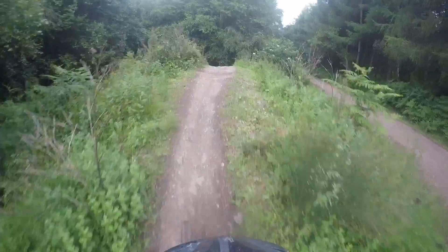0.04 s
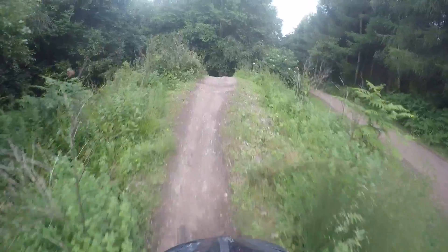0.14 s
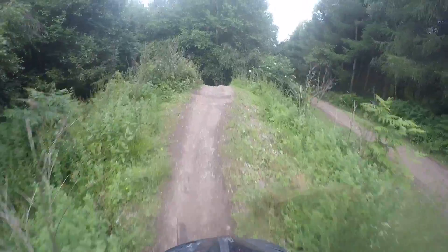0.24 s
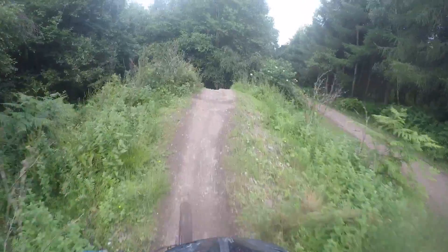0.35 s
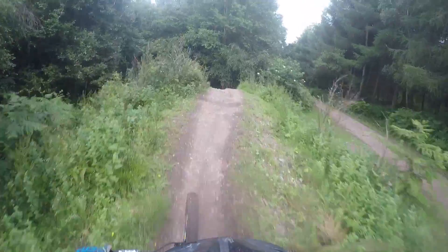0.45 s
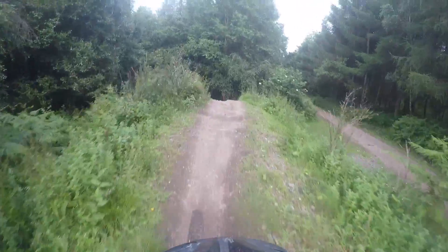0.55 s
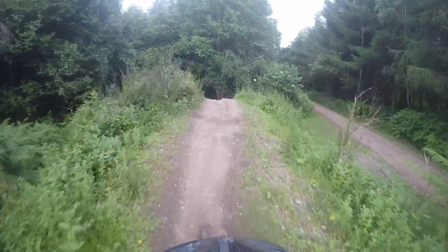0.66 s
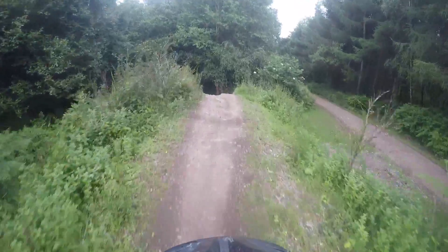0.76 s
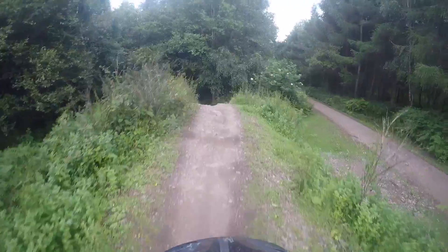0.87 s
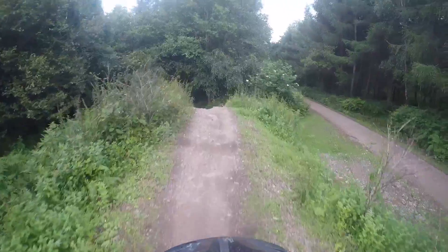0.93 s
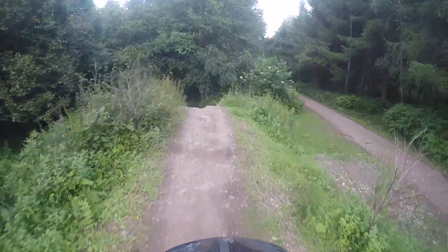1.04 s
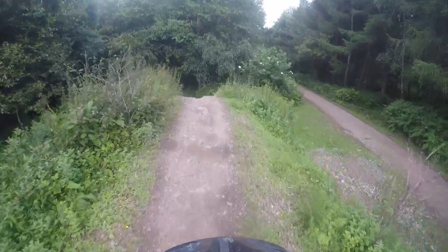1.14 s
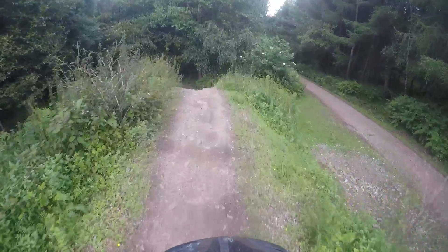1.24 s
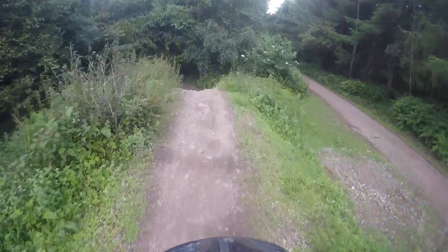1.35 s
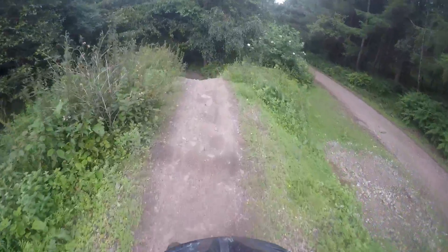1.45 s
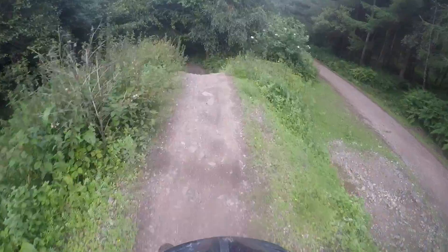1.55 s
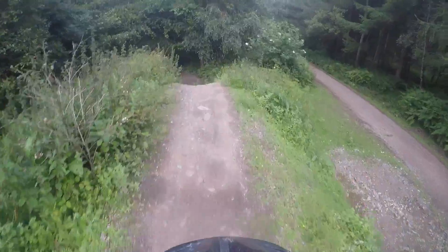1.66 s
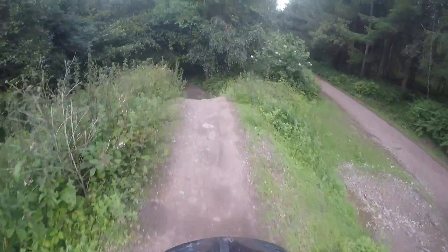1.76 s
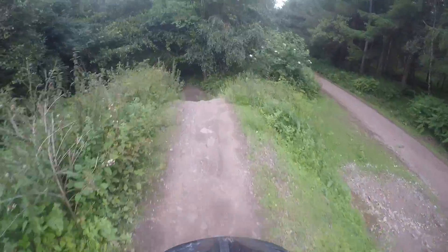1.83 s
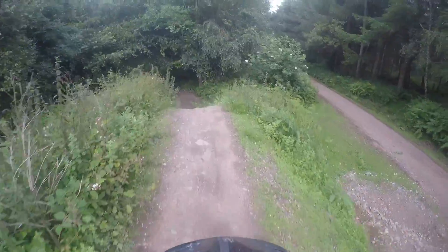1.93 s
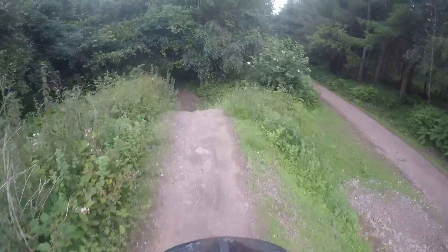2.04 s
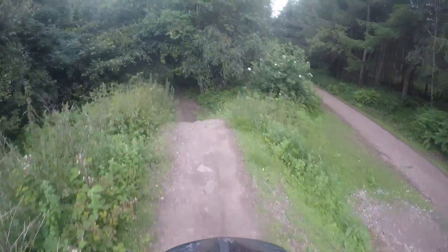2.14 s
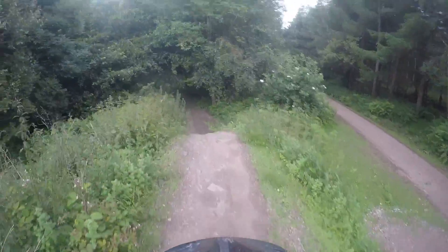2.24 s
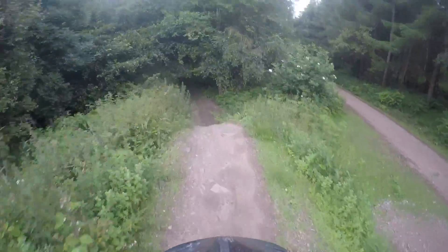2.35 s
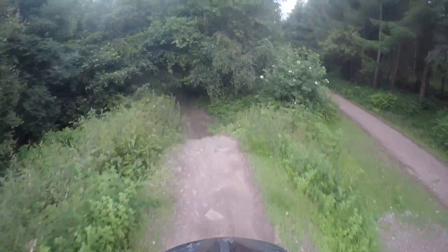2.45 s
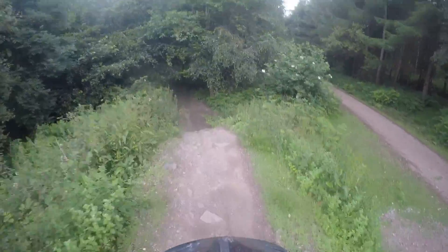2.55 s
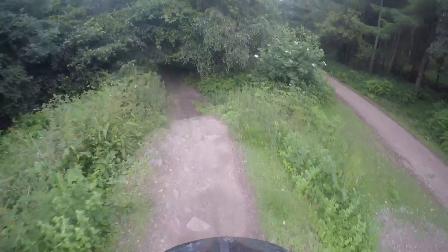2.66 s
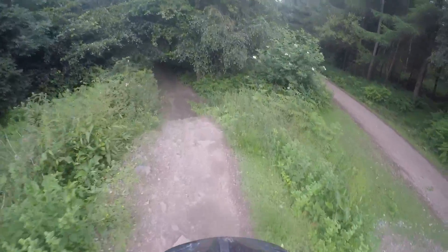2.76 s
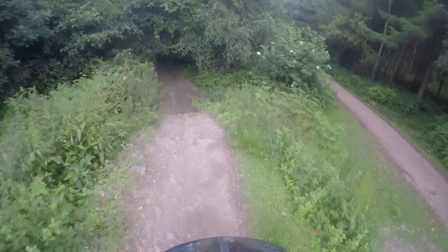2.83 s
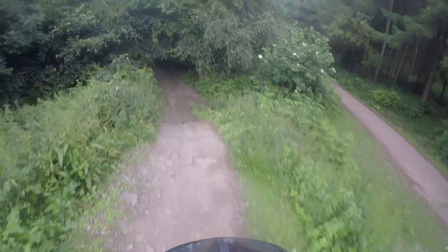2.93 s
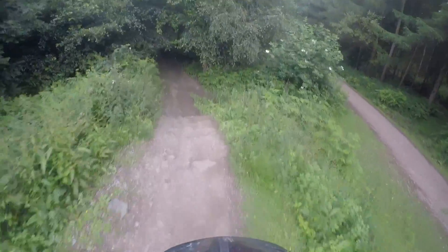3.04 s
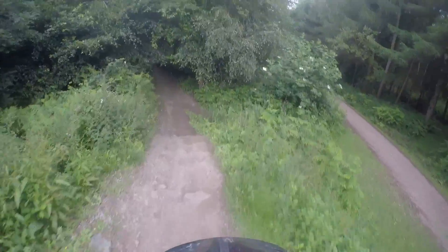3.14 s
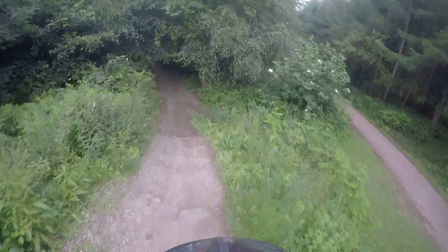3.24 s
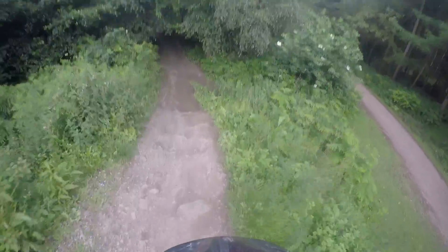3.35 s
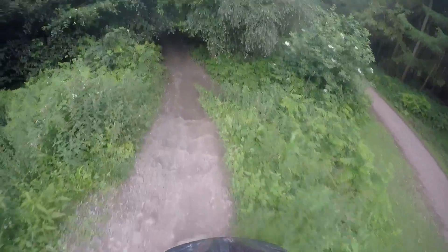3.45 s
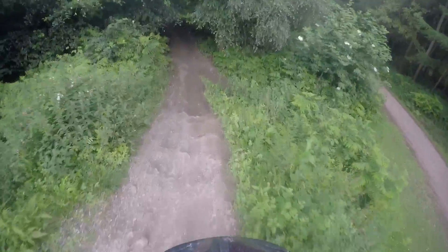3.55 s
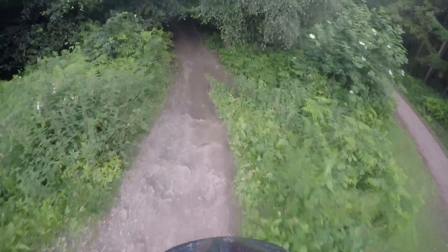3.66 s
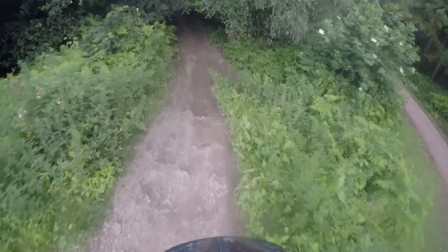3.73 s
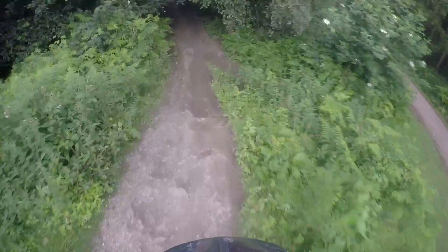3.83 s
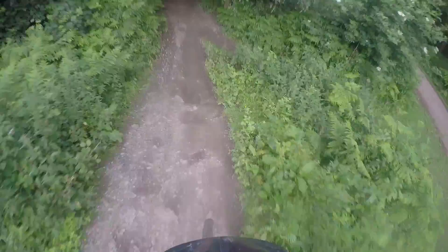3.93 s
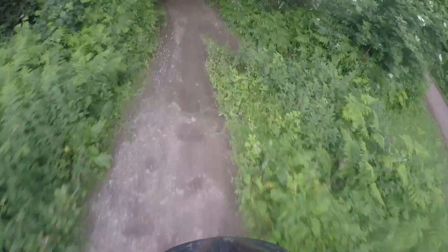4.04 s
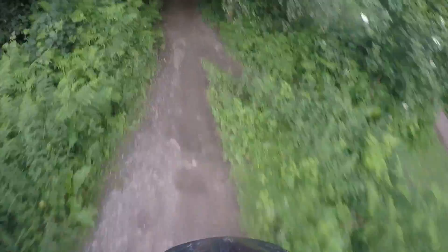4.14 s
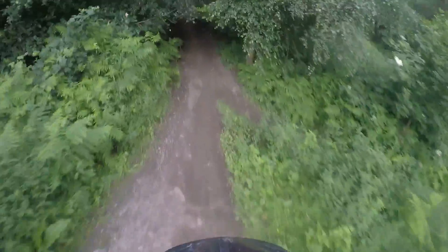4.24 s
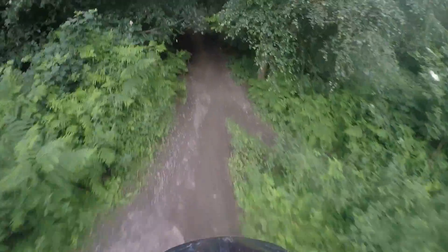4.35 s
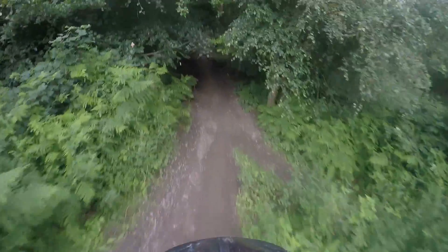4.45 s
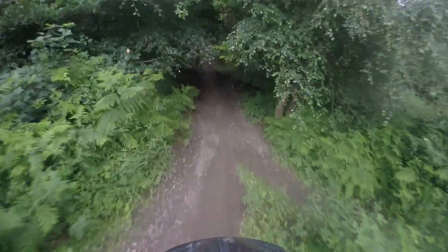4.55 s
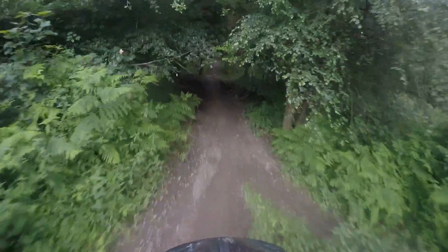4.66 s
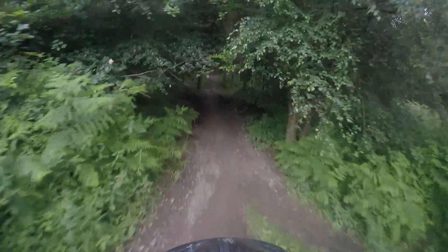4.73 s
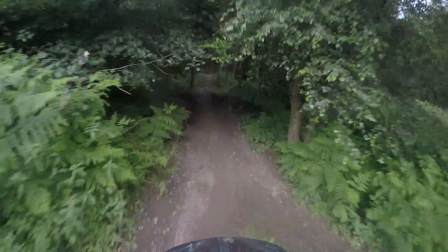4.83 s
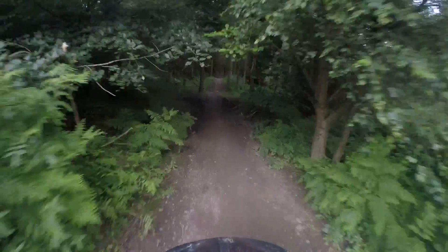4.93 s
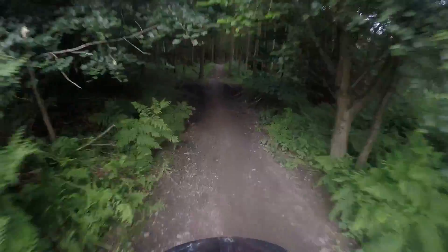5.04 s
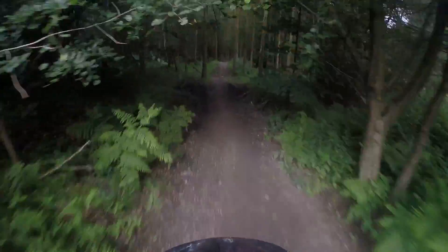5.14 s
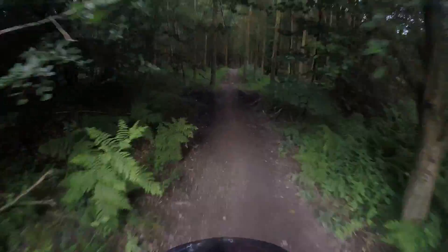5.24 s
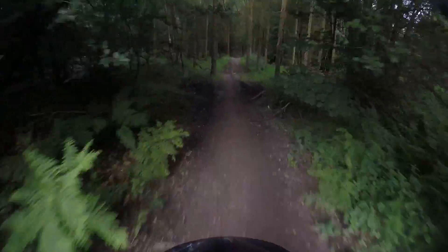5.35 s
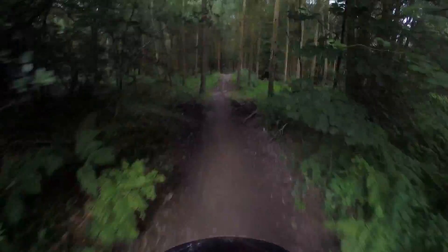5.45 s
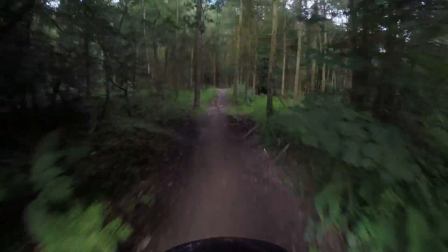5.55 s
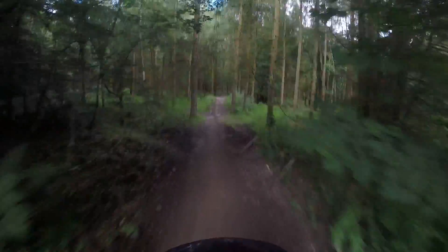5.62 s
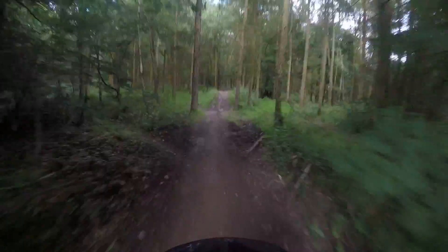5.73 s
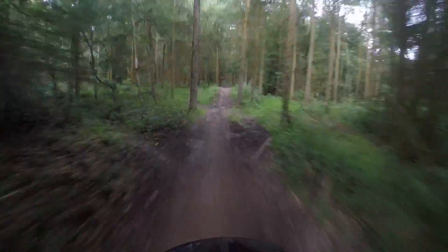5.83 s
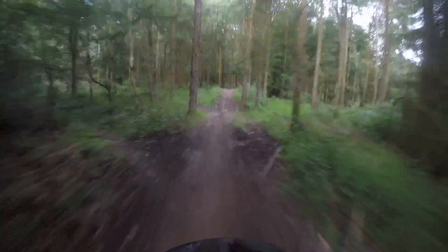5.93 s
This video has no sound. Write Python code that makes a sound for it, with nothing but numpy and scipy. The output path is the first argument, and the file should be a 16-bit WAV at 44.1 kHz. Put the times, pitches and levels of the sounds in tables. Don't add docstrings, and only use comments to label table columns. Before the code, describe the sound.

Inside a sealed helmet-camera case, a mountain bike rolls down a dirt trail. The first second is quiet: soft low wind puffs, faint steady hiss, hollow tyre grit and a creaky click around 0.8 s. At 1.27 s a sharp plastic clack and low jolt mark the crest, followed by small rattles and a lull until about 2.3 s. From 2.4 to 3.2 s bumps bring bursts of stony rumble, with a crisp tick at 2.8 s. Wind grows after 3.2 s, gusting strongly near 3.85 s, with knocks at 3.45, 3.97 and 4.25 s. Around 4.35 to 4.7 s hard thumps and clacks cluster, the helmet swings with a deep thud, and airy rushing opens up. Leaves whip sharply at 4.9 s and brush longer around 5.3 s. Deep wind booms until the end, with a hard knock at 5.7 s and a heavy low swing near 5.9 s.

```python
import sys
import numpy as np
from scipy import signal
from scipy.fft import rfft, irfft
from scipy.io import wavfile
from scipy.ndimage import uniform_filter1d

SR = 44100
rng = np.random.default_rng(int(sys.argv[2]) if len(sys.argv) > 2 else 0)


def wav_out(sig):
    wavfile.write(sys.argv[1], SR, np.round(np.clip(np.atleast_2d(sig).T, -1, 1) * 32767).astype(np.int16))


def natural_amplitude(level_db):
    exponent = np.asarray(level_db, float) / 20
    return 10 ** exponent


N = 264159
T_S = np.arange(N) / SR
HZ = np.fft.rfftfreq(N, 1 / SR)
CALM_DB = -54

# time in seconds, level in dB.
AIR_SPEED = [(0.0, -47.5), (.15, -54.5), (.68, -48.5), (.97, -54), (1.27, -48), (1.55, -56.5), (2.2, -53.5),
             (2.7, -51), (3.15, -49.5), (3.25, -42), (3.79, -42), (4.0, -36), (4.15, -39.5), (4.55, -31.5),
             (4.72, -28), (4.97, -27.5), (5.55, -25), (5.99, -22.5)]
# time in seconds, level in dB.
PORT_STREAM = [(.03, -71), (.25, -72), (.8, -68.5), (1.25, -68.5), (1.4, -70), (2.15, -72.5), (2.4, -68.5),
               (4.2, -66.5), (4.44, -60), (4.53, -51), (4.74, -50.5), (4.8, -54), (4.92, -54.5),
               (4.97, -46), (5.35, -47), (5.4, -48), (5.62, -45.5), (5.7, -42)]
# peak in seconds, tyre swell in dB, port swell in dB, fall in seconds.
BUMPS = [(.01, 5, 3, 0.03), (.84, 3, 0, .05), (1.3, 17.5, 9, 0.054), (2.3, 3, 0, .1),
         (2.5, 12.5, 6.5, 0.11), (2.63, 10, 7, 0.063), (2.82, -10, 3, 0.017), (2.88, 6, 6, .05),
         (3.0, 8, 8.5, 0.064), (3.08, 11.5, 3, 0.048), (3.17, 8, 5, 0.035), (3.32, -2, 8.5, 0.032),
         (3.45, 3, 6.5, 0.088), (3.77, 1, 6.5, 0.057), (3.85, 10.5, 12, 0.062), (3.97, -11, 3.5, .07),
         (4.25, 9.5, 11.5, 0.044), (4.35, 1, -1, 0.032), (4.42, 8, 2, .03), (4.62, 7, -4, 0.022),
         (4.67, 0.5, -0.5, 0.082), (4.89, -8, 8, .03), (5.35, 4.5, 0, 0.12)]
# centre in Hz, width in Hz, level in dB.
SHELL_MODES = [(442.3, 33, 5.5), (728, 111, -1), (965, 64, -1.5), (1347, 184, -8)]
# centre in Hz, width in Hz, level in dB.
CALM_PORT_MODES = [(2530, 250, -2.5), (3890, 110, -5), (1840, 860, -8.5)]


def unit(x):
    return x / np.sqrt(np.mean(x ** 2))


def curve(table):
    s, db = np.transpose(table)
    return np.interp(T_S, s, db)


def swells(table):
    rise_share, out = 0.35, 0
    for s, *db, fall_s in table:
        shape = np.interp(T_S, [s - rise_share * fall_s, s, s + fall_s], [0, 1, 0])
        out = out + np.outer(db, shape)
    return out


def colour(x, points):
    hz, db = np.transpose(points)
    gain = natural_amplitude(np.interp(np.log(HZ + 1), np.log(hz), db))
    return unit(irfft(rfft(x) * gain, N))


def noise(points):
    return colour(rng.standard_normal(N), points)


def band(x, low_hz, high_hz):
    return signal.sosfilt(signal.butter(3, (low_hz, high_hz), "band", fs=SR, output="sos"), x)


def ring(x, hz, width_hz):
    return signal.lfilter(*signal.iirpeak(hz, hz / width_hz, SR), x)


def body(x, modes):
    out = 0
    for k, (hz, width_hz, db) in enumerate(modes):
        out = out + (-1) ** k * natural_amplitude(db) * ring(x, hz, width_hz)
    return unit(out)


def walk(rate_hz):
    hold = int(SR / rate_hz)
    steps = np.repeat(rng.standard_normal(N // hold + 1), hold)
    return 1.22 * uniform_filter1d(uniform_filter1d(steps, hold), hold)[:N]


def grit(rate_hz, scatter_db, share):
    size = np.minimum(rng.exponential(size=N), 3)
    hits = rng.random(N) < rate_hz / SR
    stones = hits * natural_amplitude(scatter_db * size) * np.sign(rng.standard_normal(N))
    return rng.standard_normal(N) + np.clip(share, 0, .6) * unit(stones)


def rattle(samples, length_s):
    x = rng.standard_normal(samples)
    t = np.arange(samples) / SR
    decay = np.exp(-t / np.clip(length_s, .0015, .02)) + 0.049 * np.exp(-t / 0.023)
    return x * (1 - np.exp(-t / 0.0012)) * decay


def add(out, s, x, peak_db):
    i = int(s * SR)
    out[i:i + len(x)] += natural_amplitude(peak_db) * x[:N - i] / np.abs(x).max()


def wind():
    # peak in seconds, swell in dB, fall in seconds.
    gusts = [(0.01, 7, .12), (.65, 5.5, 0.033), (.75, 10.5, 0.059), (1.12, 0, 0.071), (1.3, 11.5, 0.15),
             (1.63, -5.5, 0.14), (2.52, 4, 0.072), (2.75, 7, 0.046), (2.9, 4, 0.24), (3.3, 9.5, 0.039),
             (3.42, 5.5, 0.047), (3.64, -1, 0.048), (3.85, 15.5, 0.21), (4.1, 9, 0.18), (4.3, -6, 0.072),
             (4.64, 9, 0.048), (4.9, 6.5, 0.027), (5.37, 10, 0.08), (5.49, -16, 0.17), (5.64, 3, 0.047),
             (5.9, 3, 0.13)]
    # frequency in Hz, density in dB per Hz.
    buffet_spectrum = [(4, -14.5), (10, 6.5), (22, 17), (38, 16.5), (60, 5), (90, -12), (200, -58.5),
                       (600, -100)]
    # frequency in Hz, density in dB per Hz.
    eddy_spectrum = [(30, -8), (60, 2.5), (110, -7), (170, -13.5), (250, -23), (400, -34), (800, -54),
                     (2000, -85)]
    air_db = curve(AIR_SPEED)
    buffet_db = -42 + 0.6807 * (air_db - CALM_DB) + swells(gusts)[0]
    slow = noise(buffet_spectrum)
    slow = slow / (uniform_filter1d(slow ** 2, size=6000) + .05) ** 0.58
    eddies = noise(eddy_spectrum) * natural_amplitude(1.52 * walk(18))
    push = unit(slow) + natural_amplitude(air_db + 3.5 - buffet_db) * eddies
    push = push + 0.032 * (push ** 2 - uniform_filter1d(push ** 2, size=4000))
    return natural_amplitude(buffet_db) * push


def housed_grit(scatter_db, share):
    # frequency in Hz, gain in dB.
    housing = [(100, -19), (300, 2.5), (4100, 1), (4600, -4.5), (6000, -9.5), (9000, -8), (13000, -24),
               (14000, -59)]
    return colour(grit(390, scatter_db, share), housing)


def tyres(shake):
    tyre_db = -69.5 + 0.7506 * (curve(AIR_SPEED) - CALM_DB) + swells(BUMPS)[0]
    return body(housed_grit(5, 0.67), SHELL_MODES) * natural_amplitude(tyre_db - 4.0 + 1.76 * shake)


def port_rush(shake):
    # centre in Hz, width in Hz, level in dB.
    fast_modes = [(2230, 530, -0.5), (2840, 600, 0.5), (3640, 434, 0.5), (5500, 640, -13)]
    rush_db = curve(PORT_STREAM) + swells(BUMPS)[1]
    fast = np.clip((rush_db + 66.5) / 8, 0, 1)
    air = housed_grit(7, 0.51)
    port = np.sqrt(1 - fast) * body(air, CALM_PORT_MODES) + np.sqrt(fast) * body(air, fast_modes)
    flutter_db = (1 - 0.68 * fast) * (0.94 * shake + 1.0 * walk(30))
    return port * natural_amplitude(rush_db - .5 + flutter_db)


def brush():
    # peak in seconds, swell in dB, fall in seconds.
    leaves = [
        (4.6, 8, .1),
        (4.75, 10, .1),
        (4.885, 18, .03),
        (5.3, 12.5, 0.26),
    ]
    # frequency in Hz, density in dB per Hz.
    brush_spectrum = [(3000, -14.5), (5000, -1.5), (7500, -4.5), (8200, -10.5), (10500, -16.5),
                      (12700, -22), (13200, -48), (14000, -74)]
    brush_db = -73.5 + 1.52 * (curve(PORT_STREAM) + 50) + swells(leaves)[0]
    return colour(grit(350, 1, 0.37), brush_spectrum) * natural_amplitude(brush_db - 2.0 + 1.2 * walk(20))


def ride():
    shake = walk(14)
    return tyres(shake) + port_rush(shake) + brush()


def knock_set(out, table, mix_db, varies):
    # low edge in Hz, high edge in Hz.
    part_bands = [(806, 1850), (344, 693), (1890, 2660), (3300, 4680)]
    names = ("mount", "shell", "port", "latch")
    for s, peak_db, relative_db, length_s in table:
        scrape = rattle(4096, length_s)
        rung = 0
        for hz, width_hz, db in [*SHELL_MODES, *CALM_PORT_MODES]:
            rung = rung + natural_amplitude(db) * ring(scrape, hz, 2.1 * width_hz)
        scrape = scrape + 4 * rung
        for (low_hz, high_hz), part_db, name in zip(part_bands, mix_db, names):
            level_db = peak_db + part_db + relative_db * (name == varies)
            add(out, s - .001, band(scrape, low_hz, high_hz), level_db)


def knocks():
    # start in seconds, peak in dB, shell relative level in dB, rattle in seconds.
    mount_knocks = [(1.271, -37.5, -6, .0028), (1.275, -36.5, -7, .004), (1.296, -49, -11, 0.011),
                    (1.363, -51, 0, 0.0026), (1.442, -50, -7, .004), (1.609, -53, -10, .004),
                    (1.872, -50, -4, .0032), (2.463, -40.5, -13, 0.0027), (3.0, -44, -16, .0035),
                    (3.063, -48.5, -6, .0046), (3.264, -51, -10, .004), (3.445, -36.5, -7, 0.00088),
                    (3.481, -49, -14, 0.0058), (3.834, -43, -10, 0.0044), (3.975, -36.5, -7, 0.0019),
                    (4.023, -45.5, -7, 0.0045), (4.251, -39, -6, 0.006), (4.473, -34.5, -12, 0.0015),
                    (4.518, -37.5, -12, 0.0057), (4.61, -33, -1.5, .0034), (4.666, -40, -6, 0.0027),
                    (4.692, -34.5, -3, 0.005), (4.726, -45, -5, .0046), (4.881, -34.5, -20, .0061),
                    (4.899, -41, -1, 0.0046), (5.135, -36.5, 1, 0.0031)]
    # start in seconds, peak in dB, mount relative level in dB, rattle in seconds.
    shell_thumps = [
        (2.377, -48, -13, 0.0015),
        (2.941, -48, -20.5, 0.015),
        (3.309, -49.5, -3, .0048),
        (3.39, -55, 6, 0.0066),
        (3.859, -48, -3, .005),
        (4.344, -34.5, -12, .0053),
        (4.616, -37, -2, .0023),
        (5.719, -31, -14, 0.0042),
    ]
    # start in seconds, peak in dB, mount relative level in dB, rattle in seconds.
    port_clicks = [(.17, -50.5, -11, 0.0023), (.836, -40, -1, 0.0051), (.993, -51, -9, 0.0032),
                   (1.299, -47, 0, 0.0054), (1.517, -51.5, 0, 0.0037), (2.396, -50.5, 0, 0.0056),
                   (2.631, -60, -4, 0.0039), (3.771, -52, -1, 0.003), (4.418, -45.5, -5, .0073),
                   (4.474, -40, -6, 0.0018), (4.587, -38.5, -4, .0035), (4.617, -36, -3, .0025),
                   (5.552, -39, -6, .0057)]
    # start in seconds, peak in dB, mount relative level in dB, rattle in seconds.
    latch_ticks = [
        (.545, -56, -3, 0.0049),
        (1.271, -44.5, -16, 0.0046),
        (2.81, -38, -17, 0.0025),
        (3.067, -53, -1, .003),
        (5.768, -33.5, -15, 0.0018),
    ]
    # start in seconds, peak in dB, length in seconds.
    snaps = [
        (0.5437, -50.5, 0.0058),
        (0.835, -42.5, 0.0036),
        (1.27, -41, 0.007),
        (1.2964, -52, 0.004),
        (2.809, -47, 0.0052),
        (4.5894, -56, 0.004),
        (4.866, -61, 0.0044),
    ]
    out = np.zeros(N)
    knock_set(out, mount_knocks, (-4.5, -3.5, -9, -26), "shell")
    knock_set(out, shell_thumps, (-3.5, -2, -10.5, -26), "mount")
    knock_set(out, port_clicks, (-5.5, -31, -1.5, -8.5), "mount")
    knock_set(out, latch_ticks, (2, -32, -18, 0.5), "mount")
    for s, peak_db, length_s in snaps:
        add(out, s - .001, band(rattle(2048, length_s), 3900, 9400), peak_db - 4.5)
    return out


def jolts():
    # start in seconds, peak in dB, frequency in Hz, 60 dB decay in seconds.
    swings = [(1.268, -39, 362, 0.03), (1.271, -38.5, 940, 0.043), (1.285, -27, 22.34, 0.41),
              (1.3, -40.5, 203, 0.13), (2.377, -43, 200, 0.042), (3.444, -47.5, 2000, .02),
              (4.4, -32, 22.5, 0.4), (3.975, -40.5, 956, 0.022), (3.976, -36, 2300, 0.013),
              (4.251, -31.5, 177, 0.053), (4.342, -33.5, 445, 0.072), (4.343, -35, 590, 0.026),
              (4.599, -19, 33.2, 0.25), (5.5, -21, 36.5, 0.15), (5.884, -13.5, 54.1, 0.32)]
    # start in seconds, peak in dB.
    grit_ticks = [(4.2078, -75), (4.2218, -69), (4.2353, -60), (4.2961, -71), (4.3141, -63), (4.3979, -72),
                  (4.4562, -68), (4.5979, -65), (4.764, -68), (4.8089, -62), (4.9207, -48), (5.003, -69)]
    out, t = np.zeros(N), np.arange(N // 12) / SR
    for s, peak_db, hz, t60_s in swings:
        envelope = (1 - np.exp(-t * hz)) * 1000 ** (-t / t60_s)
        add(out, s, -np.sin(2 * np.pi * hz * t) * envelope, peak_db)
    for s, peak_db in grit_ticks:
        add(out, s, band(rattle(512, .002), 13400, 15000), peak_db - 5.5)
    return out


def hiss():
    # frequency in Hz, density in dB per Hz.
    hiss_spectrum = [(180, -26.5), (300, 1), (431, -5), (836, -4.5), (1040, 0), (1780, -9.5), (2640, -5.5),
                     (12700, -20)]
    return natural_amplitude(-65) * noise([*hiss_spectrum, (13000, -48)])


def top_hiss():
    # start in seconds, length in seconds.
    gaps = [(0.0, .08), (.44, .03), (.585, .015), (.72, 0.098), (1.404, .05), (2.34, .025), (2.935, .03),
            (3.02, .02), (3.248, .015), (3.37, .04), (3.58, .04), (3.8, .03), (3.86, .025), (4.14, .07),
            (5.1, .04)]
    top = noise([(12600, -52.0), (12850, 3), (14800, -5.5), (15200, -5.0), (15400, -57)])
    all_lost = sum(1. * ((T_S > s) & (T_S < s + length_s)) for s, length_s in gaps)
    all_lost = uniform_filter1d(all_lost, size=200)
    rarity = 2.0 - np.clip(.4 * (curve(AIR_SPEED) + 41), 0, 1.5)
    out = 0
    for low_hz in np.arange(12500, 15500, 600):
        patches = np.clip(4 * (walk(45) - rarity), 0, 1)
        lost = np.clip(all_lost + patches, 0, 1)
        out = out + band(top, low_hz, low_hz + 600) * natural_amplitude(-23 * lost + 1.2 * walk(60))
    return natural_amplitude(-81.5) * out


def scene():
    return (wind() + ride() + knocks() + jolts() + hiss() + top_hiss())[None]


def top_cut(x):
    return signal.sosfilt(signal.butter(12, 15550, fs=SR, output="sos"), x)


def record(dry):
    dry = signal.sosfilt(signal.butter(2, 13, "high", fs=SR, output="sos"), dry)
    left_s = (N - np.arange(N)) / SR
    ease = np.clip(.7 + left_s / .02, 0, 1)
    return top_cut(dry * ease)


dry = scene()
out = record(dry)
wav_out(out)
```